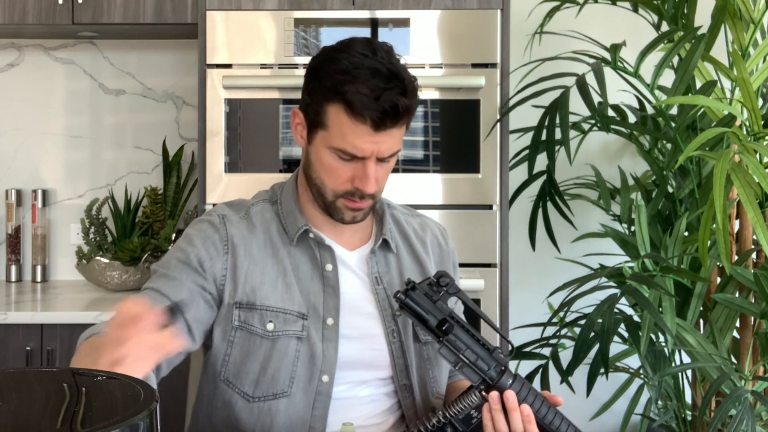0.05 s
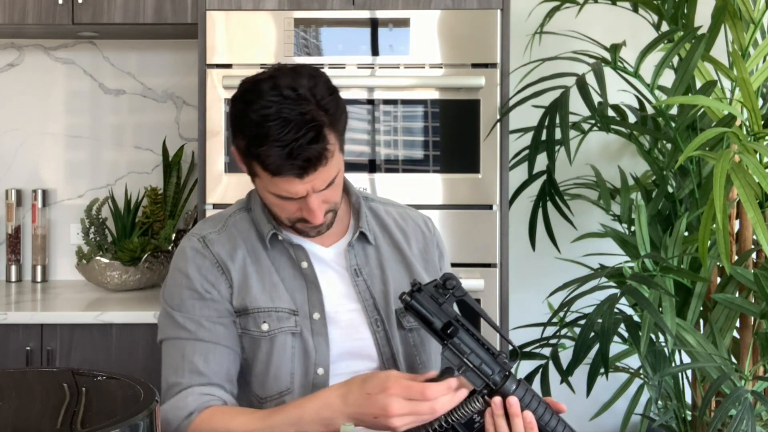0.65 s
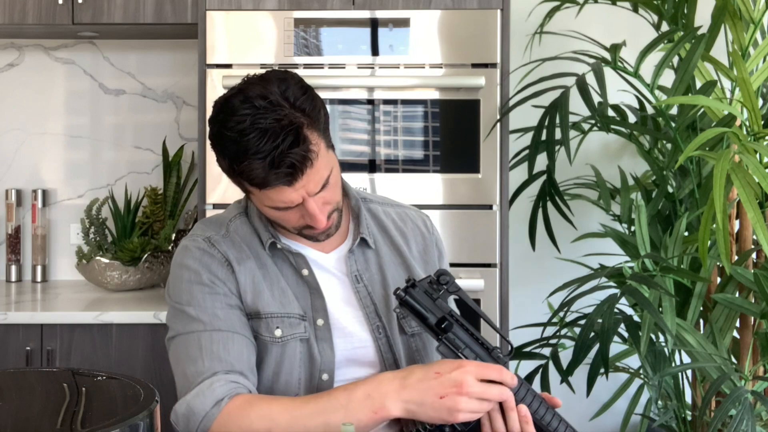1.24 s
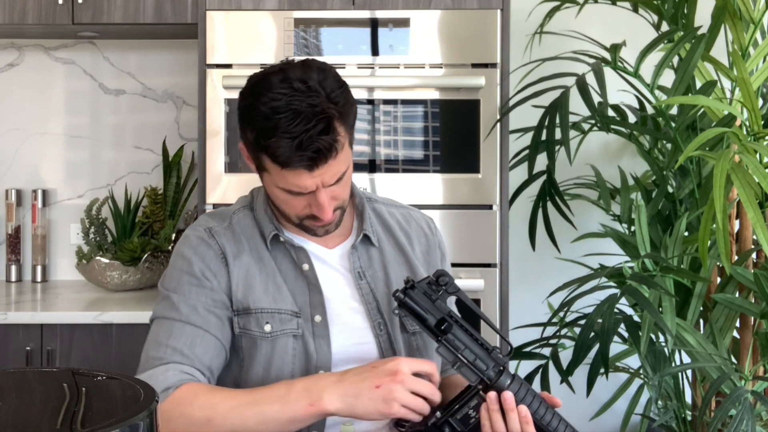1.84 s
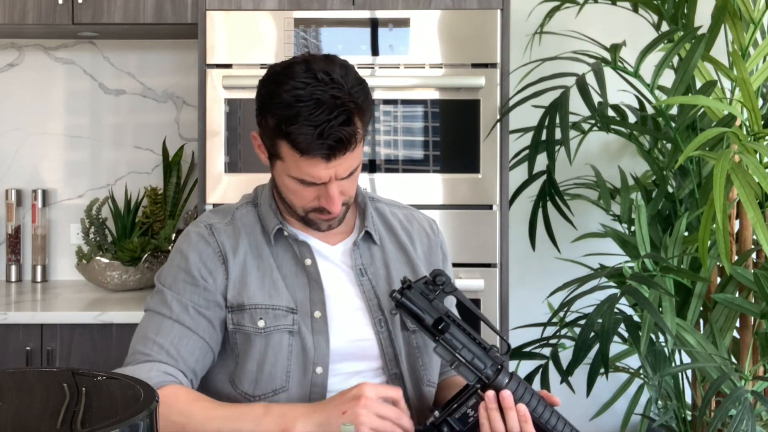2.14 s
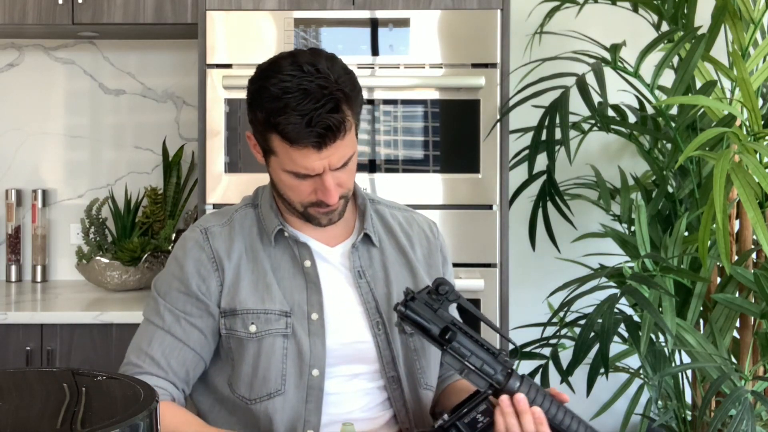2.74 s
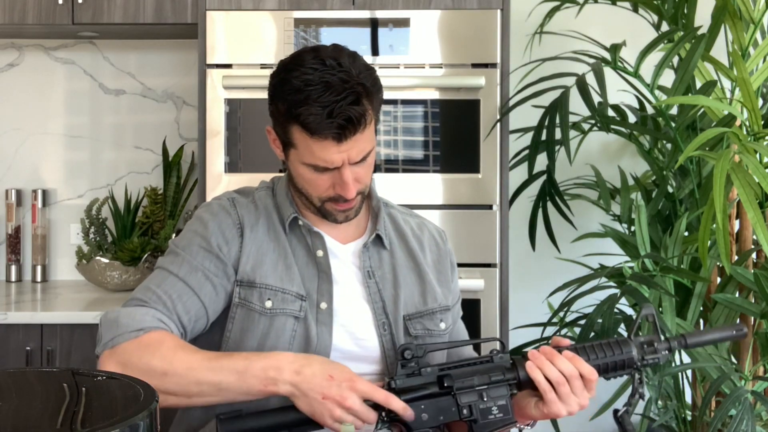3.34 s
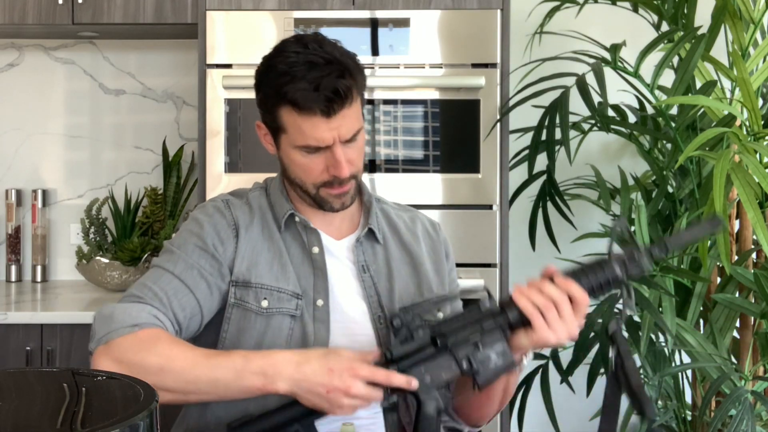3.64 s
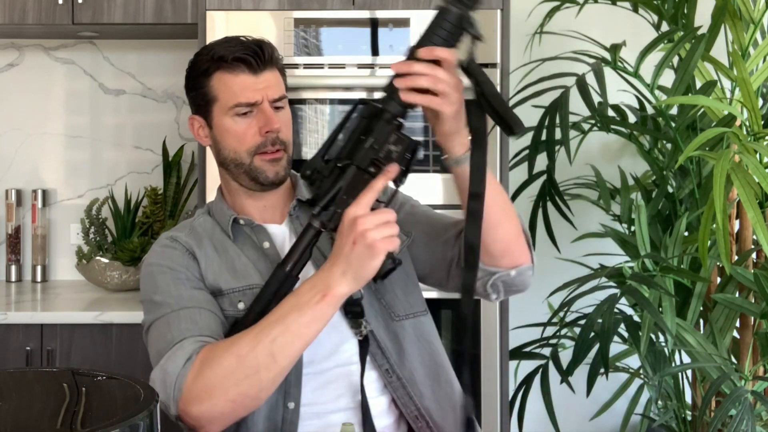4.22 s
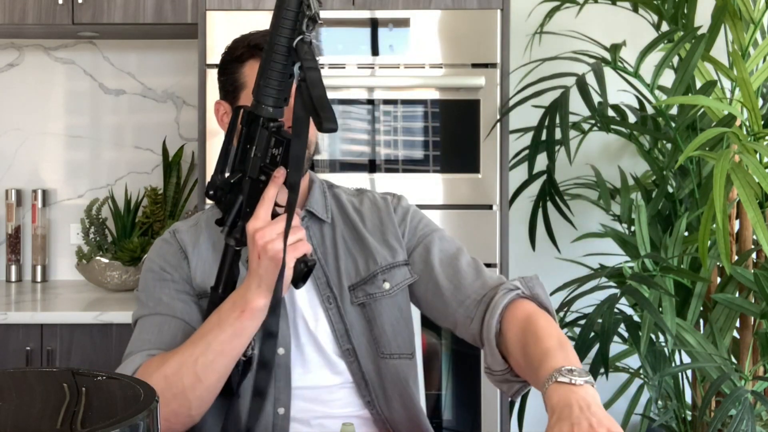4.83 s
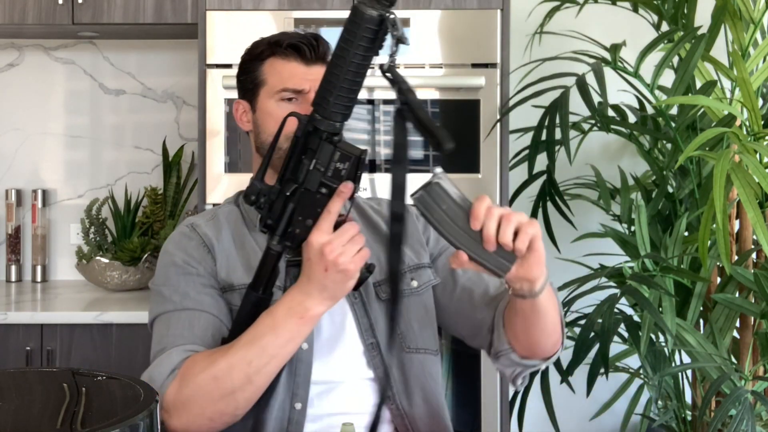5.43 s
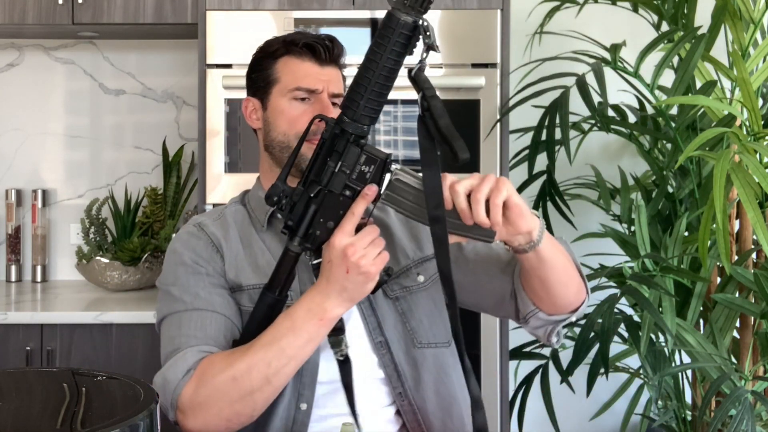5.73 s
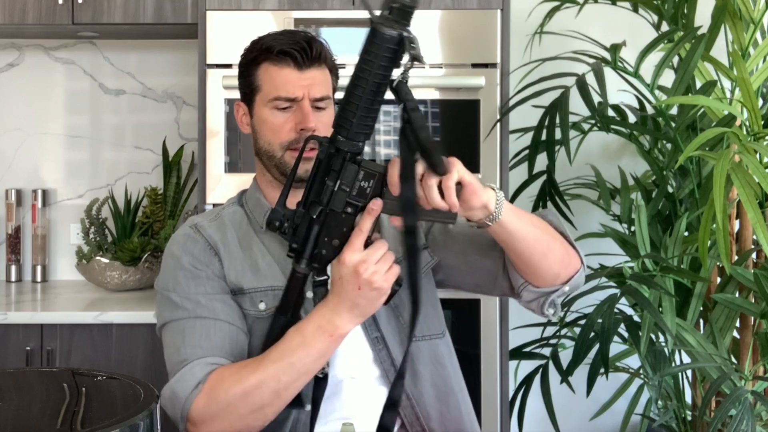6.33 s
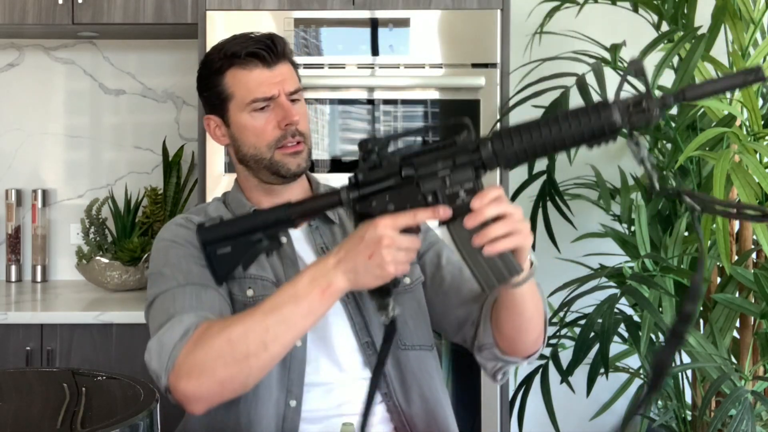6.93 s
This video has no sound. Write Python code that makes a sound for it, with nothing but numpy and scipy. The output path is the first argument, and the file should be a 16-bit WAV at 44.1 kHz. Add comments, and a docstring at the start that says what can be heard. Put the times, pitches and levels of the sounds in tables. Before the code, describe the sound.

Light ticks and two sharp clacks of a toy rifle snapping shut, then knocking fittings and a magazine sliding in and latching.

```python
"""Handling an airsoft rifle in a kitchen

A man works a small part into the rifle with scrapes and ticks, snaps it shut with two hard clacks,
tilts it so that loose fittings knock, then taps a magazine against its well, slides it in and lets
the catch click. Impacts excite the rifle's resonances briefly; friction drives them continuously.
The live room reverberates, and a low rumble lies under everything."""
import sys
import numpy as np
from scipy import signal
from scipy.fft import rfft, irfft, next_fast_len
from scipy.io import wavfile
from scipy.ndimage import map_coordinates

SR = 44100
rng = np.random.default_rng(int(sys.argv[2]) if len(sys.argv) > 2 else 0)


def master_out(mix):
    """Clip the mix to full scale and print it as 16-bit PCM to the path in sys.argv[1]."""
    frames = np.transpose(np.atleast_2d(mix))
    ceiling = np.clip(frames, -1, 1)
    pcm = np.round(ceiling * 32767).astype(np.int16)
    wavfile.write(sys.argv[1], SR, pcm)


N = 316197

# Hard blows. Each row: start in seconds, place, strength in dB, hardness in dB, number of rebounds.
IMPACTS = [(0.202, "loose part", -61, -2, 0), (0.215, "loose part", -56.5, 3.5, 0),
           (1.494, "pin", -66.5, 4, 0), (1.551, "pin", -52.5, -1, 0), (1.812, "pin", -62, -0.5, 0),
           (2.109, "pin", -60, 8, 0), (2.219, "pin", -51.5, 4, 0), (2.33, "pin", -50, 2, 0),
           (2.398, "latch", -32, -3.5, 1), (2.4335, "pin", -41, 1, 0), (2.441, "receiver", -41.5, -2, 0),
           (3.0335, "receiver", -24, 1.5, 2), (3.071, "receiver", -32.5, -1, 0),
           (3.1267, "receiver", -31, 0.5, 1), (3.362, "receiver", -29, 4, 0), (3.369, "latch", -22, 2, 0),
           (3.397, "latch", -35, 2, 0), (4.471, "loose part", -51.5, -4, 0),
           (5.7435, "well rim", -37.5, -0.5, 0), (5.866, "magazine", -54.5, -11, 1),
           (6.0196, "magazine", -31.5, -1, 0), (6.037, "magazine", -30.5, -3, 0),
           (6.076, "magazine", -33.5, -2.5, 1), (6.089, "magazine", -29, 6, 0),
           (6.098, "magazine", -38, 3.5, 1), (6.121, "magazine", -27, 9, 0),
           (6.1236, "receiver", -24.5, 3, 1), (6.735, "pin", -66, 3, 0), (6.948, "loose part", -60, -1, 0)]
# Contact points. Each row, by place: thud pitch in Hz; thud, clack, tick and metal ring in dB
# as offsets from the bite; reverberation in dB.
PLACES = {"loose part": (793, -27, -9.5, -4.5, -32, -1.5), "pin": (289.5, -6, -2.5, 8, -9, 3),
          "receiver": (838, -15.5, 1, -1.5, -12.5, -0.5), "latch": (690.5, -28, -13.5, -0.5, -12, -2),
          "well rim": (1328.5, 7.5, 1, 1, -3, 0), "magazine": (579, -3, 3, -0.5, -11, -3)}
# Change of thud, clack, bite and tick in dB for each dB of hardness.
HARDNESS_SLOPES = (-1.2, -0.62, -0.45, 1)
# Loss of thud, clack, bite and tick in dB at each rebound.
REBOUND_LOSS_DB = (1.5, 2.3, 7.5, 6)
# Hollow modes of the receiver. Each row: frequency in Hz, bandwidth in Hz, gain in dB.
SHELL_MODES = [(838, 150, -1), (1158, 100, -1), (1298, 100, -0.5), (1524, 230, 3), (2078, 850, -4.5)]
# Modes of small stiff parts. Each row: frequency in Hz, bandwidth in Hz, gain in dB.
FITTING_MODES = [(2500, 690, 2.5), (3053, 190, 5.5), (3436, 360, 4), (5030, 260, -11)]
# Low modes of the whole rifle. Each row: frequency in Hz, bandwidth in Hz, gain in dB.
STOCK_MODES = [(290, 180, 1), (666, 320, 4.5)]
# Ringing metal parts. Each row: frequency in Hz, relative level in dB, 60 dB decay time in seconds.
METAL_MODES = [(1118, -8, 0.12), (1460, -9.5, 0.35), (1580, -5.5, 0.22), (1620, -1, 0.27),
               (1575, -6.5, 0.28), (1920, -12.5, 0.12), (2429, -4.5, 0.41), (2470, -2.5, 0.23),
               (2660, -12.5, 0.25), (3590, -4.5, 0.75), (3760, -1, 0.45), (3880, -7.5, .3),
               (3823, -2.5, .35)]
# Spectrum of the bright tick. Each row: frequency in Hz, relative level in dB.
TICK_SPECTRUM = [(1500, -40), (3500, -17), (5000, -7), (6500, -3), (8000, -3), (9700, 0), (11300, -1),
                 (13500, -6), (15500, -11), (17000, -24)]
# Soft knocks of sling fittings and magazine. Each row: start in seconds, strength in dB, pitch in Hz.
KNOCKS = [(3.649, -43.5, 1440), (3.786, -50, 1643), (3.867, -35, 980), (4.002, -34, 1520),
          (4.12, -34.5, 918), (4.245, -40.5, 1160), (4.315, -47.5, 875), (4.438, -42.5, 1450),
          (4.518, -40.5, 1750), (5.234, -56.5, 900), (5.333, -47, 582), (5.48, -43, 576),
          (6.776, -38, 1670), (6.784, -41.5, 910), (6.863, -38, 930), (7.055, -44.5, 1240)]
# Part sliding on part. Each row: start and end in seconds, place, strength in dB, hardness in dB.
SLIDES = [(1.297, 1.436, "loose part", -68, 6), (1.466, 1.702, "pin", -63, -4),
          (1.80, 1.99, "pin", -68, -5), (2.099, 2.178, "pin", -52, -3), (2.214, 2.315, "pin", -52, -2.5),
          (2.33, 2.45, "pin", -47, -4), (2.58, 2.70, "pin", -68.5, -13),
          (2.726, 2.875, "receiver", -74, -8.5), (5.866, 6.02, "receiver", -73.5, -13),
          (6.029, 6.13, "magazine", -41, 0.5), (6.555, 6.67, "magazine", -66.5, 2)]
# Hands and sleeve on the rifle. Each row: start and end in seconds, strength in dB.
RUBS = [(3.721, 4.004, -69.5), (4.118, 4.327, -65), (4.54, 4.577, -76.5), (5.317, 5.388, -71.5),
        (5.43, 5.521, -73.5), (6.788, 6.91, -68.5)]
# Reverberation time of the kitchen. Each row: frequency in Hz, 60 dB decay time in seconds.
KITCHEN_T60 = [(200, 0.22), (700, 0.73), (1500, 0.73), (3300, 0.72), (6000, 0.66), (9000, 0.39),
               (15000, 0.23)]
# Likeness of left and right reverberation. Each row: frequency in Hz, correlation (clipped to +-1).
REVERB_CORRELATION = [(100, .8), (300, 0.04), (650, 0.25), (1400, -0.0079), (4000, .1), (7400, -0.027),
                      (8700, -1.7), (9900, -1.7), (11000, 0.58), (13000, -0.5)]
# Phase of the direct sound. Each row: frequency in Hz, lag of left behind right in radians.
LEFT_LAG = [(50, 1.5), (860, 1), (1900, 0.7), (2500, 2), (4500, 2.5), (7000, 1.76), (8600, 4), (9700, 3.5),
            (11200, 2.5), (12500, 1.73), (16000, -3)]
# Room rumble and hiss. Each row: frequency in Hz, relative spectral density in dB.
RUMBLE_SPECTRUM = [(20, -36.5), (40, -16.5), (62, 1.5), (85, -4), (125, -5), (220, -9), (320, -19.5),
                   (480, -31), (900, -37), (1600, -45), (2300, -41.5), (3200, -47), (8000, -55.5),
                   (13500, -54), (15500, -60.5)]
# Likeness of left and right rumble. Each row: frequency in Hz, correlation.
RUMBLE_CORRELATION = [(60, 0.87), (250, 0.36), (700, 0), (3000, 0.12), (13000, 0)]
# Stereo balance. Each row: frequency in Hz, left minus right level in dB.
BALANCE = [(60, 8.5), (250, 6), (500, 4), (1000, 0.4), (2000, 2.5), (4000, 0.5)]


def impacts(thud_db=24, clack_db=25, bite_db=26, tick_db=27, stock_db=-17, rebound_s=0.0075):
    """Impact excitation: each blow sets the rifle vibrating, and each rebound has less energy."""
    out, t = np.zeros((2, N)), np.arange(SR // 4) / SR
    decays_s = (0.024, 0.025, 0.013, 0.02)  # thud, clack, bite, tick
    for start, place, db, hardness, rebounds in IMPACTS:
        thud_hz, *_, ring_db, room_db = PLACES[place]
        first_db = contact_levels(place, db, hardness) + [thud_db, clack_db, bite_db, tick_db]
        for k in range(rebounds + 1):
            gains = amp(first_db - k * np.array(REBOUND_LOSS_DB))
            _, clack_gain, bite_gain, _ = gains
            parts = zip(gains, decays_s, body_responses(thud_hz))
            blow = sum(gain * struck(t, t60, response) for gain, t60, response in parts)
            ring = amp(ring_db) * bite_gain * metal_ring(t)
            bump = amp(stock_db) * clack_gain * stock_bump(t)
            add(out, start + k * rebound_s, in_kitchen(blow + ring + bump, room_db))
    return out


def contact_levels(place, db, hardness):
    """Harder contact favours high frequencies. Gives thud, clack, bite and tick in dB."""
    _, thud, clack, tick, _, _ = PLACES[place]
    return db + np.array([thud, clack, 0, tick]) + hardness * np.array(HARDNESS_SLOPES)


def struck(t, t60, response, attack_s=0.00012, flatness=0.72):
    """Source and filter: the brief broadband chatter of two meeting faces drives a resonant body."""
    chatter = rng.standard_normal(len(t)) * (1 - np.exp(-t / attack_s)) * amp(-60 * t / t60)
    spectrum = rfft(chatter, 2 * len(t))
    # Partial whitening lets the body set the colour.
    force = irfft(spectrum / (abs(spectrum) + 1e-9) ** flatness)[:len(t)]
    return unit_energy(filtered(force, response))


def body_responses(thud_hz):
    """Four parallel filters: hollow thud, clack of the shell, bite of small parts, bright tick."""
    thud = lambda hz: resonances([(thud_hz, 0.65 * thud_hz, 0)])(hz) ** 2
    return thud, shell, fittings, minimum_phase(TICK_SPECTRUM)


def shell(hz, cut_hz=650):
    """The hollow receiver radiates little below its first resonances."""
    return resonances(SHELL_MODES)(hz) * (1j * hz / (cut_hz + 1j * hz)) ** 2


def fittings(hz, cut_hz=1500):
    """Parts much smaller than the wavelength radiate poorly, so they give no bass."""
    return resonances(FITTING_MODES)(hz) * (1j * hz / (cut_hz + 1j * hz)) ** 2


def metal_ring(t, scatter_db=3):
    """Free vibration: metal modes decay exponentially from new random strengths at every blow."""
    hz, db, t60 = np.transpose(METAL_MODES)[:, :, None]
    envelopes = amp(db + scatter_db * rng.standard_normal(hz.shape) - 60 * t / t60)
    partials = np.sin(2 * np.pi * (hz * t + rng.random(hz.shape)))
    return unit_energy(np.sum(envelopes * partials, 0))


def stock_bump(t, t60=0.014, cut_hz=900):
    """Heavy damping: the stock's broad low modes give a dull bump with no ring."""
    return struck(t, t60, lambda hz: resonances(STOCK_MODES)(hz) / (1 + 1j * hz / cut_hz))


def knocks(body_db=13, clack_db=-7, stock_db=-11, bite_db=8, tick_db=-1):
    """Soft impact: loose fittings excite a damped hollow note, the shell and a light rattle."""
    out, t = np.zeros((2, N)), np.arange(SR // 3) / SR
    for start, db, hz in KNOCKS:
        note = struck(t, 0.025, resonances([(hz, 0.13 * hz, 0)]))
        hardness = min(hz / 1300, 1)  # low knocks are padded
        clack = hardness * amp(clack_db) * struck(t, 0.082, shell)
        bite = hardness ** 0.5 * amp(bite_db) * struck(t, 0.025, fittings)
        tick = hardness ** 2 * amp(tick_db) * struck(t, 0.018, resonances([(6000, 1000, 0)]))
        body = amp(body_db) * (note + clack + amp(stock_db) * stock_bump(t))
        knock = amp(db) * (body + bite + tick)
        softened = filtered(knock, lambda f: 1 / (1 + (f / 8000) ** 6))  # soft faces give no top
        add(out, start, in_kitchen(softened, room_db=-2))
    return out


def friction(strokes, slips_per_s, level_db, room_db, uneven_db=7, fade_s=0.0086):
    """Stick-slip friction: tiny slips of uneven size drive the same resonances as the blows."""
    out = np.zeros((2, N))
    for start, end, thud_hz, levels_db in strokes:
        length = max(end - start, fade_s)
        t = np.arange(int((length + fade_s) * SR) + 512) / SR
        slip_sizes = rng.standard_normal(int(t[-1] * slips_per_s) + 4)
        grip = amp(uneven_db * map_coordinates(slip_sizes, [t * slips_per_s]))
        pressure = np.clip(t / fade_s, 0, 1) * np.clip((length - t) / fade_s + 1, 0, 1)
        scrape = sum(amp(db) * unit_rms(filtered(grip * rng.standard_normal(len(t)), response))
                     for db, response in zip(levels_db, body_responses(thud_hz)))
        add(out, start, in_kitchen(amp(level_db) * pressure * scrape, room_db))
    return out


def sliding_parts():
    """Friction of part on part: rapid slips make a fine scrape."""
    strokes = [(start, end, PLACES[place][0], contact_levels(place, db, hardness))
               for start, end, place, db, hardness in SLIDES]
    return friction(strokes, slips_per_s=350, level_db=-4.5, room_db=2)


def rubbing_hands(thud_hz=860):
    """Friction of skin and cloth: slower slips make a soft rustle."""
    balance_db = np.array([-0.5, 5, -5, -6.5])  # thud, clack, bite, tick
    strokes = [(start, end, thud_hz, db + balance_db) for start, end, db in RUBS]
    return friction(strokes, slips_per_s=71, level_db=-5, room_db=-3)


def in_kitchen(x, room_db, build_s=0.003, early_boost=0.7, early_s=0.048):
    """Reverberation: direct sound, strong early reflections, then a decaying diffuse field."""
    noise = rng.standard_normal((2, int(0.8 * SR)))
    hz, frame_s, spectra = signal.stft(noise, SR, nperseg=256)
    decay = amp(-60 * frame_s / along(KITCHEN_T60, hz)[:, None])
    tail = signal.istft(spectra * decay, SR, nperseg=256)[1]
    t = np.arange(tail.shape[1]) / SR
    onset = (1 - np.exp(-(t / build_s) ** 2)) * (1 + early_boost * np.exp(-t / early_s))
    tail = np.sqrt(2) * unit_energy(correlated(tail * onset, REVERB_CORRELATION))
    out = amp(room_db) * signal.fftconvolve(x[None], tail, axes=1)
    direct = filtered(x, lambda f: np.exp(0.5j * along(LEFT_LAG, f) * np.array([[-1], [1]])))
    add(out, 0, direct)
    return out


def room_rumble(level_db=-55):
    """Stationary noise: a low rumble with a trace of hiss."""
    air = correlated(rng.standard_normal((2, N)), RUMBLE_CORRELATION)
    return amp(level_db) * unit_rms(filtered(air, lambda hz: amp(along(RUMBLE_SPECTRUM, hz))))


def resonances(modes):
    """Modal superposition: the response of damped resonators summed with alternating signs."""
    return lambda hz: sum((-1) ** k * amp(db) * 1j * hz * width / (f0 ** 2 - hz ** 2 + 1j * hz * width)
                          for k, (f0, width, db) in enumerate(modes))


def minimum_phase(points):
    """Folding the cepstrum onto positive time gives a causal response with the given spectrum."""
    def response(hz):
        cepstrum = irfft(np.log(amp(along(points, hz))))
        half = len(cepstrum) // 2
        cepstrum[1:half] *= 2
        cepstrum[half + 1:] = 0
        return np.exp(rfft(cepstrum))
    return response


def correlated(pair, correlation):
    """Mid-side mixing turns two independent signals into left and right of a given correlation."""
    def weights(hz):
        angle = np.arccos(np.clip(along(correlation, hz), -1, 1)) / 2
        return np.array([np.cos(angle), np.sin(angle)])
    mid, side = filtered(pair, weights)
    return np.array([mid + side, mid - side])


def filtered(x, response):
    """Linear filtering: the spectrum of x is multiplied by a frequency response."""
    n = x.shape[-1]
    padded = 2 * next_fast_len(n // 2 + 2048)
    return irfft(rfft(x, padded) * response(np.fft.rfftfreq(padded, 1 / SR)), padded)[..., :n]


def along(points, hz):
    """Interpolation of (Hz, value) points on a logarithmic frequency axis."""
    point_hz, values = np.transpose(points)
    return np.interp(np.log(hz + 1), np.log(point_hz + 1), values)


def add(track, start_s, x):
    """Superposition of x on the track from a given time."""
    part = track[..., max(round(start_s * SR), 0):][..., :x.shape[-1]]
    part += x[..., :part.shape[-1]]


def amp(db):
    return 10 ** (np.asarray(db) / 20)


def unit_rms(x):
    return x / np.sqrt(np.mean(x ** 2) + 1e-20)


def unit_energy(x):
    return x / np.sqrt(np.sum(x ** 2) + 1e-20)


def scene():
    """Superposition: the pressures of the handling sounds and the room's rumble add."""
    return impacts() + knocks() + sliding_parts() + rubbing_hands() + room_rumble()


def record(dry, top_hz=15950):
    """A level difference favours the left, most in the bass; a steep low-pass limits the band."""
    leaning = filtered(dry, lambda hz: amp(along(BALANCE, hz) * np.array([[0.5], [-0.5]])))
    return filtered(leaning, lambda hz: 1 / np.sqrt(1 + (hz / top_hz) ** 200))


dry = scene()
out = record(dry)
master_out(out)
```